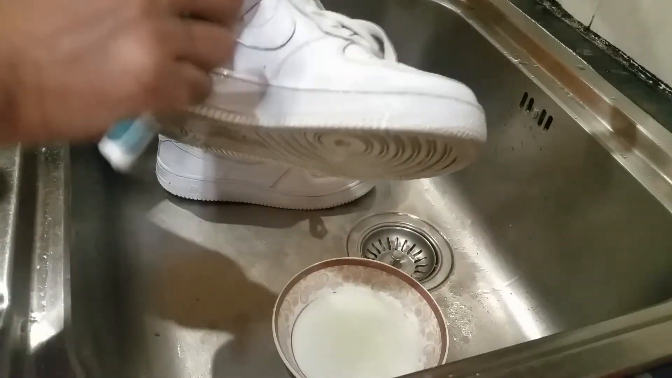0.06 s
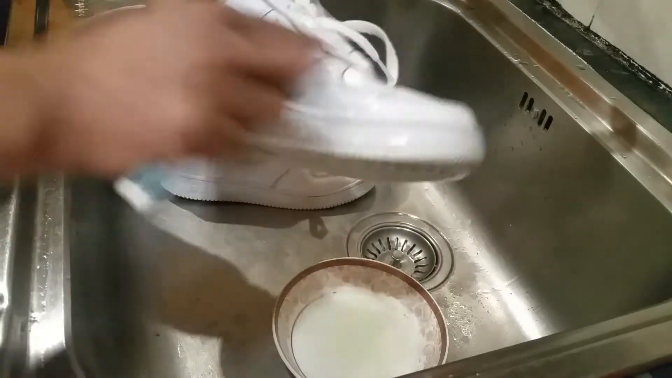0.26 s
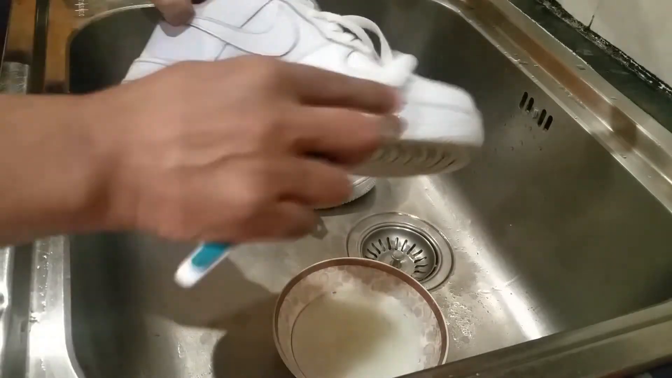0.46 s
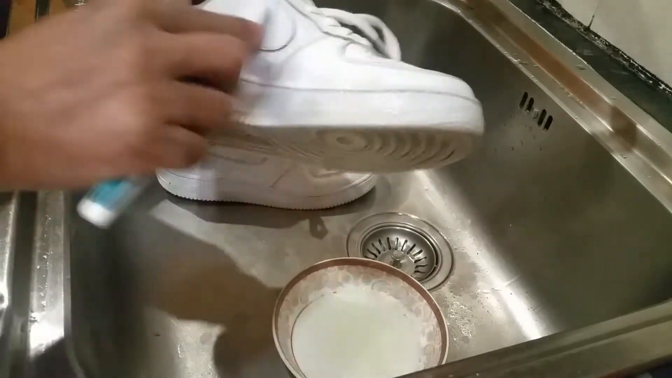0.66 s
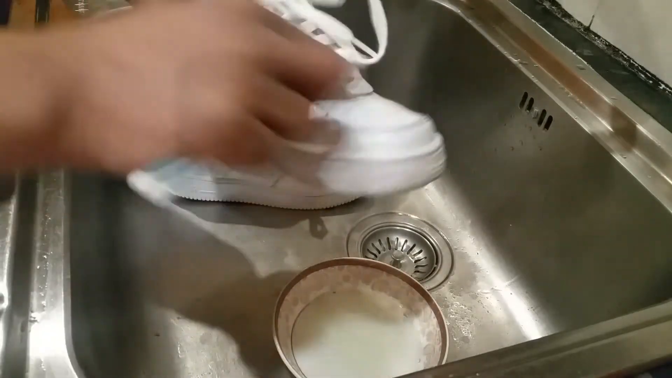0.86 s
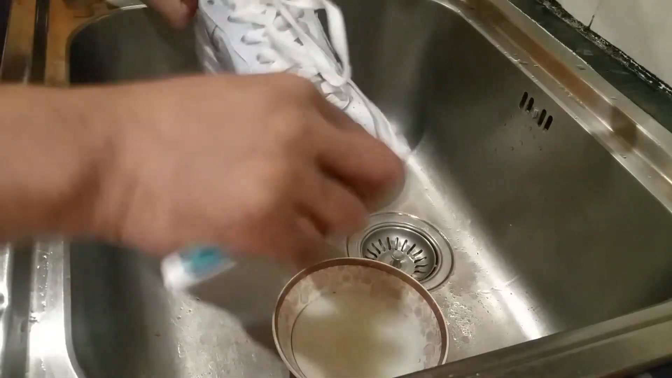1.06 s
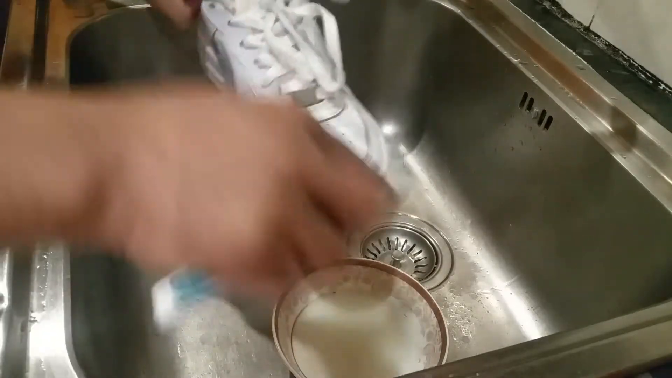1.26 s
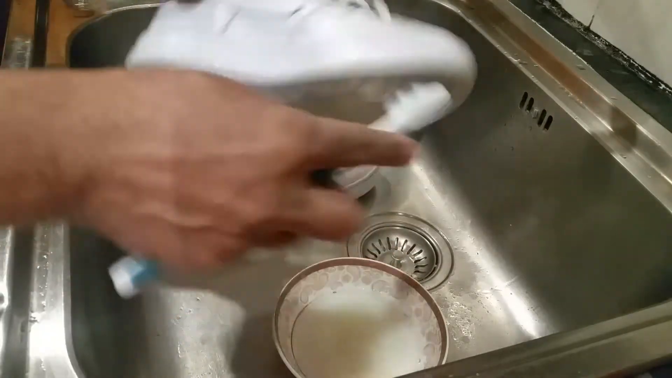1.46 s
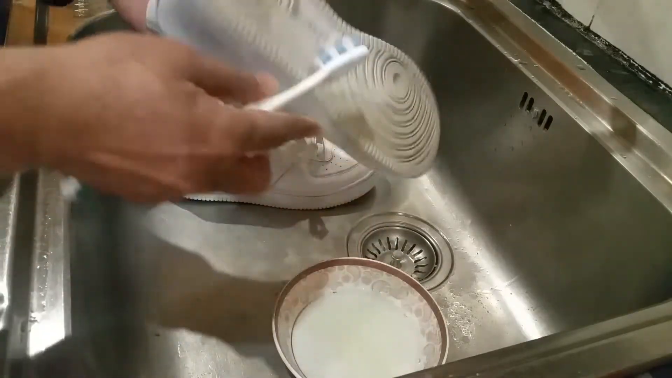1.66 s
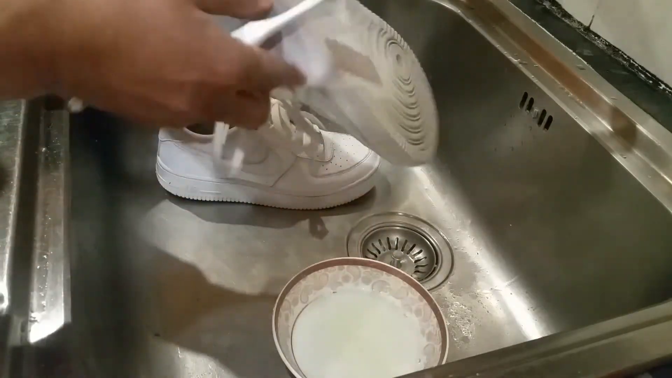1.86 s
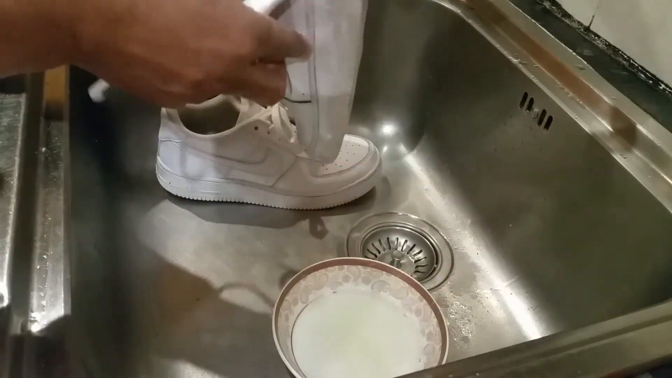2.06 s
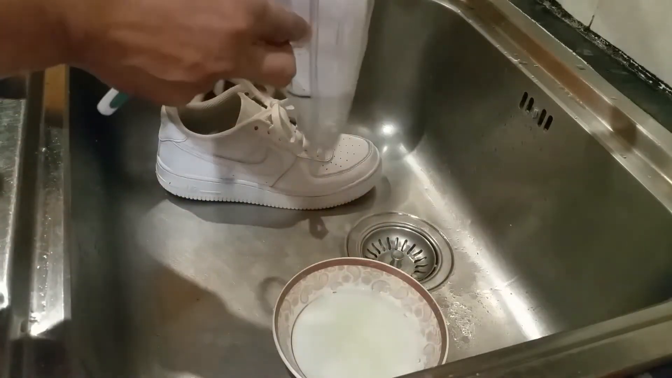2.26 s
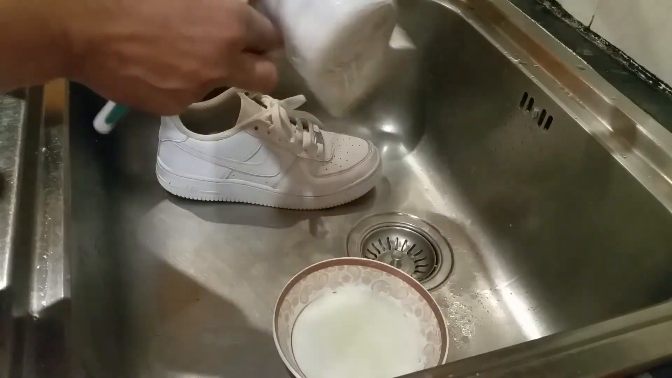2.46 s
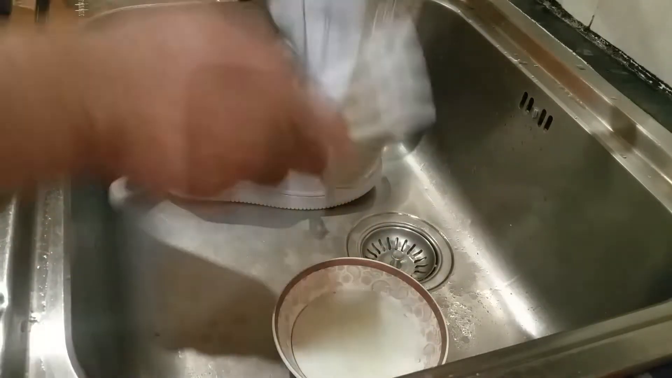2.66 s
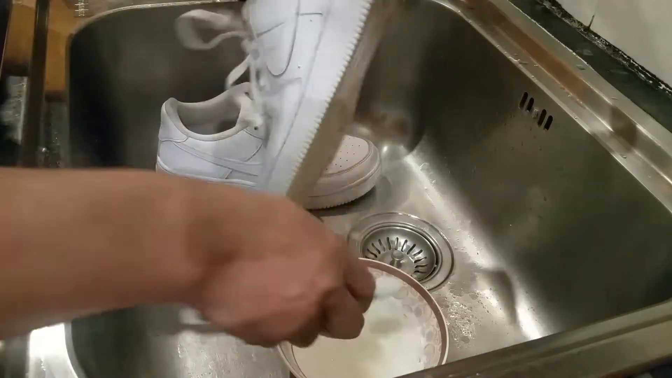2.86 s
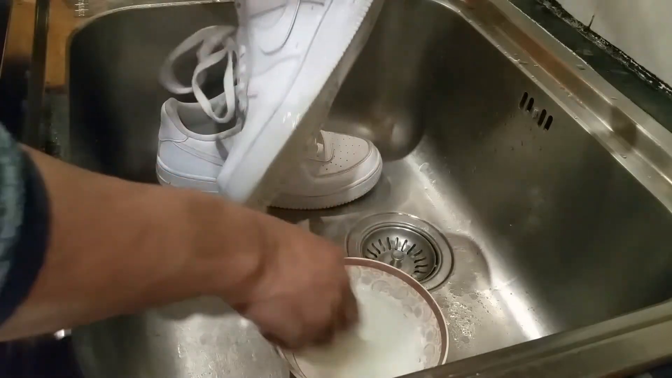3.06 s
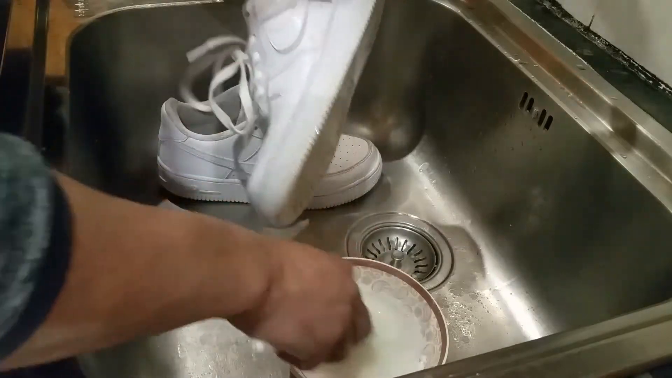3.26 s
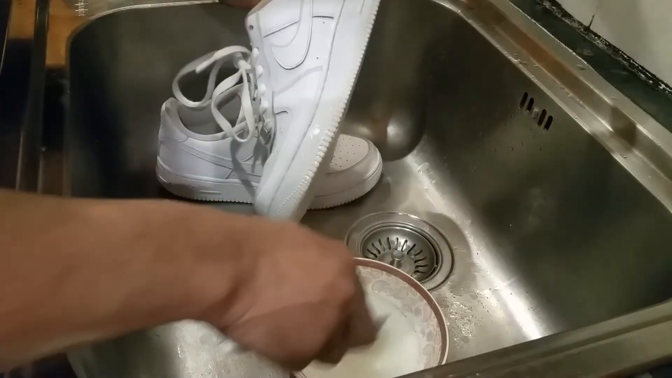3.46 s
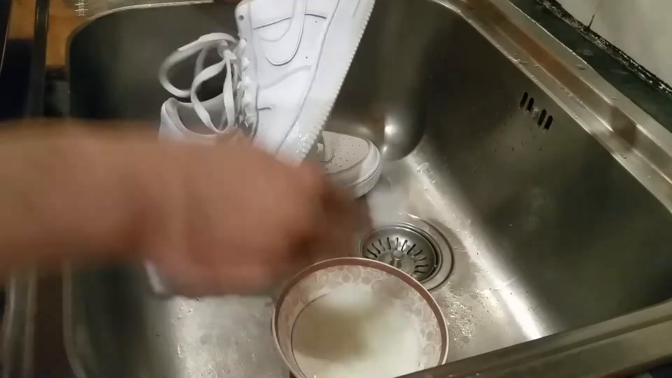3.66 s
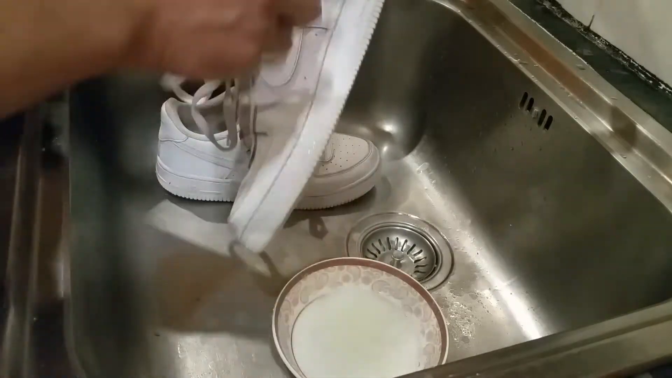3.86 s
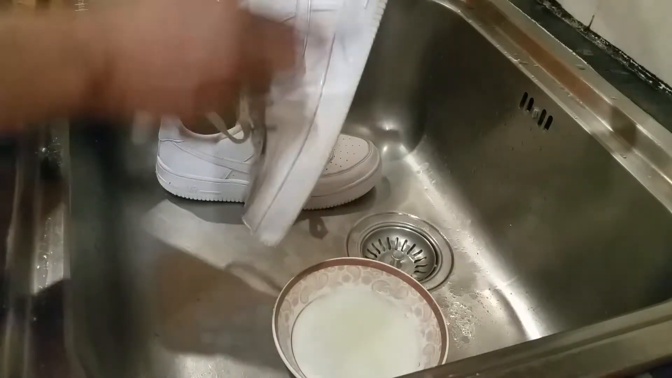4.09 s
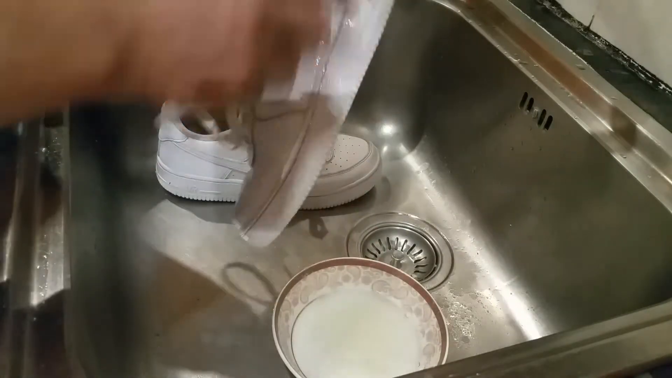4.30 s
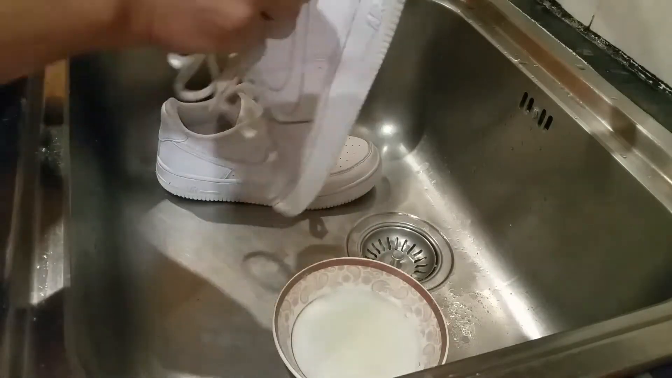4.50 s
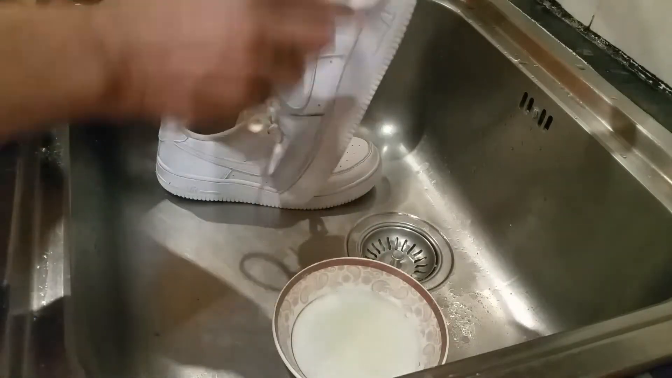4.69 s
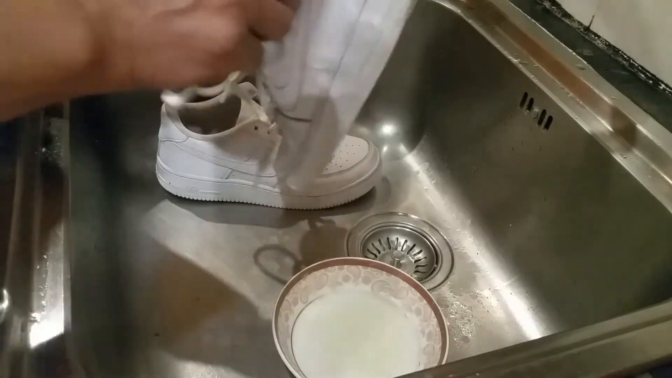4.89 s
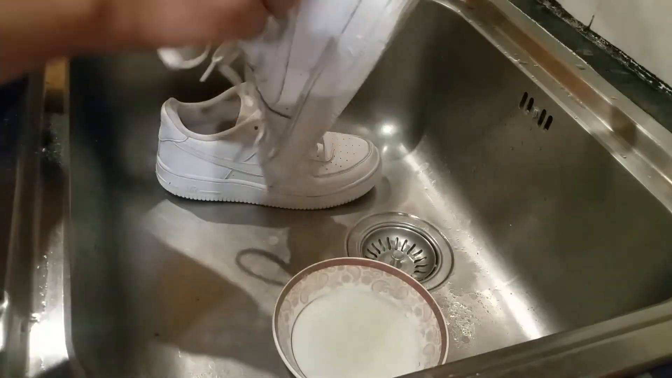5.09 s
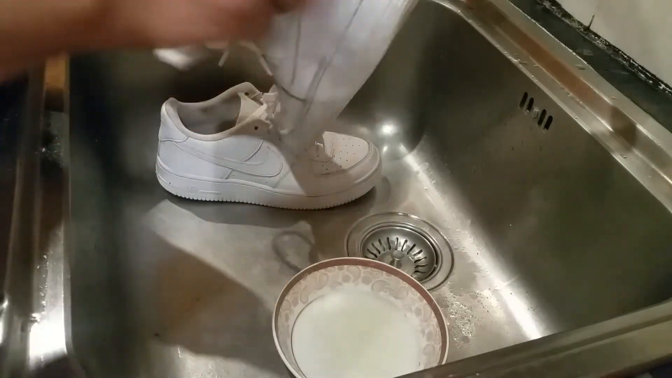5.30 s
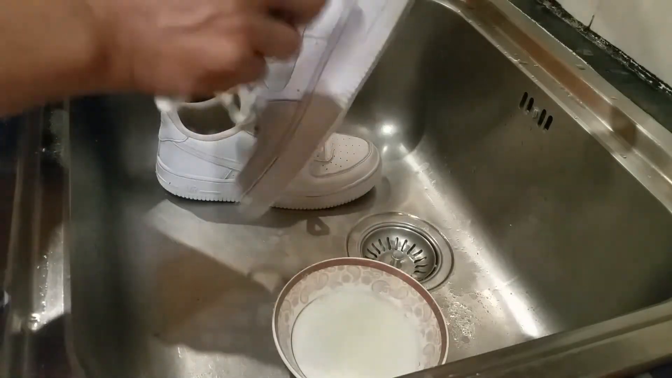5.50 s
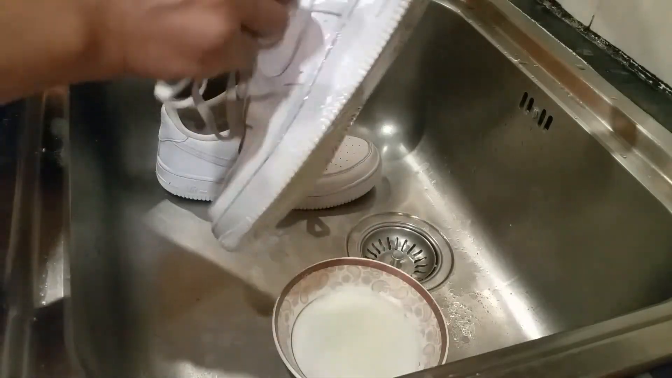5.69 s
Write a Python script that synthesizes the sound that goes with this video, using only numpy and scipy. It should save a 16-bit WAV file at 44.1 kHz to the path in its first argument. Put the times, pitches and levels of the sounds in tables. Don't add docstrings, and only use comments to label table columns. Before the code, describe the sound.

From the start, a toothbrush scrubs a leather trainer close to the microphone: quick, dry, bright rasps with a papery drag and a hollow body beneath. Dull knocks punctuate the strokes, strongest around 1.06 s, with sharp clicks near 0.23, 0.76 and 1.24 s. Scrubbing stops at about 1.4 s. In the lull, hands turn the shoe with soft creaks and rustles, small knocks from 1.75 to 2.4 s and a firmer thud at 2.67 s. At 3.2 s the brush taps a china bowl, faint wet swishes follow, and around 3.4 to 3.5 s the bowl gives a low judder on the steel basin. A light knock comes at 3.64 s, another at 3.97 s. From about 4.0 s brisk scrubbing resumes on the heel, continuing to the end with crisp ticks near 4.63, 5.0 and 5.49 s and low basin bumps around 5.1 s. Faint kitchen hum, short hard reflections, brushing toward the right.

```python
import sys
import numpy as np
from scipy import signal
from scipy.fft import rfft, irfft, next_fast_len
from scipy.io import wavfile
from scipy.ndimage import uniform_filter1d, minimum_filter1d, map_coordinates

SR = 44100
rng = np.random.default_rng(int(sys.argv[2]) if len(sys.argv) > 2 else 0)


def store_pcm(level_fs):
    pcm = np.round(np.clip(level_fs, -1, 1) * 32767).astype(np.int16)
    wavfile.write(sys.argv[1], SR, np.atleast_2d(pcm).T)


def makeup_ratio(level_db):
    decades = np.asarray(level_db, float) / 20
    return 10 ** decades


N = 253134

# pitch_hz, density_db (per Hz)
HUM_SPECTRUM = [(12, -21), (20, 3), (22, -14), (55, -3), (83, -10.5), (158, -5.5), (214, -15), (455, -17),
                (1640, -28), (1830, -23.5), (1990, -25), (3890, -30), (5000, -26), (8740, -35.5),
                (15900, -34.5)]
HUM_DB = -63
# pitch_hz, width_hz, level_db
WHINE = [(5460, 170, 5)]
# pitch_hz, likeness (0 to 1)
ALIKE = [(60, 0.61), (170, 0.71), (500, 0.66), (1000, 0.34), (2500, 0.3), (7000, 0.1)]
# pitch_hz, t60_s
ROOM_DECAY = [(200, 0.14), (2000, 0.11), (12000, 0.032)]

# pitch_hz, width_hz, level_db
BASIN_MODES = [(173, 9.2, 8), (220, 73, -13), (290, 34, -5), (436, 31, -22), (536, 24, -16), (770, 62, -23),
               (990, 56, -26)]
# time_s, level_db
JUDDER = [
    (3.385, -41),
    (3.4, -43),
    (3.42, -37),
    (3.44, -40),
    (3.455, -46),
    (3.475, -41),
    (3.5, -64),
    (3.52, -76),
]
CYCLES_PER_SLIP = 3
# start_s, peak_db, pitch_hz, t60_s
BUMPS = [(3.118, -48, 153, 0.13), (3.147, -51.5, 203, 0.095), (3.323, -45, 157, 0.091),
         (3.388, -34, 159.5, 0.12), (4.441, -47, 149, 0.19), (4.895, -41, 90.5, 0.082),
         (5.109, -35, 143, 0.12), (5.142, -39.5, 150, 0.11), (0.96, -41, 113, 0.11),
         (3.972, -45, 290, 0.11), (2.77, -51, 201, 0.12), (5.201, -45, 138.5, 0.42)]
# start_s, peak_db, t60_s, crack_db
TAPS = [
    (3.2053, -34, 0.017, -4),
    (3.212, -47, 0.016, -4),
    (3.241, -52, 0.02, -24),
    (3.2668, -42.5, 0.016, -14),
    (3.2812, -50, 0.018, -24),
]
# pitch_hz, level_db
CHINA = [(1150, -21), (1300, 8.5), (1460, -2), (2250, 3), (3200, -8)]
# fastest_s, speeding_up_s, slowing_s, level_db, spare_db
SWISH = [
    (3.33, 0.024, 0.02, -66, 0),
    (3.37, 0.034, 0.028, -63, 0),
    (3.66, 0.015, 0.02, -66, 0),
]
# pitch_hz, width_hz, level_db
FOAM = [(4250, 700, 0)]

# fastest_s, speeding_up_s, slowing_s, creak_db, rustle_over_creak_db
TURNS = [(1.42, 0.033, 0.025, -56, -7), (1.765, 0.018, 0.053, -57, -13), (1.82, 0.027, 0.056, -62, -6),
         (1.96, 0.087, 0.04, -59.5, -7.5), (2.03, 0.054, 0.099, -51.5, -6),
         (2.143, 0.011, 0.034, -57.5, -3.5), (2.19, 0.029, 0.057, -57, -2.5), (2.27, 0.04, 0.05, -65, 0.5),
         (2.36, 0.06, 0.057, -58, -5.5), (2.43, 0.044, 0.098, -52, -8), (2.6, 0.1, 0.14, -60.5, -9),
         (2.74, 0.049, 0.06, -52.5, -11), (2.92, 0.11, 0.034, -59, -14), (3.1, 0.33, 0.082, -62.5, -5),
         (3.36, 0.17, 0.087, -67, 5), (3.6, 0.44, 0.12, -65, -0.5), (3.818, 0.012, 0.012, -63, -13),
         (3.92, 0.065, 0.3, -75.5, 10)]
# pitch_hz, width_hz, level_db
GRIP = [(280, 200, -1), (461, 65, 4.5), (615, 51, 0), (884, 130, -2), (1350, 740, -10.5)]
# pitch_hz, density_db (per Hz)
SKIN = [(880, -5.5), (1500, -4.5), (1900, -6.5), (2430, -4), (6360, -14.5), (10100, -13), (15700, -17.5)]

# start_s, peak_db, main_ring_hz, t60_s,
# crack_db
KNOCKS = [(0.033, -53, 375, 0.16, -17), (0.098, -39, 404, 0.048, -20), (0.222, -44.5, 416, 0.069, -20),
          (0.349, -37, 670, 0.029, -16), (0.505, -39, 430, 0.056, -20), (0.679, -43, 288, 0.062, -34),
          (0.758, -39, 280, 0.055, -20), (0.594, -39, 826, 0.053, -16), (0.636, -28.5, 311, 0.044, 1.5),
          (0.933, -29.5, 274, 0.022, -28), (0.938, -28.5, 670, 0.027, -19), (0.968, -34.5, 326, 0.017, 4),
          (1.031, -31, 272, 0.019, -14), (1.058, -20, 334, 0.017, -36), (1.0598, -28.5, 766, 0.031, -21),
          (1.084, -30, 727, 0.023, -36), (1.235, -43.5, 400, 0.097, -15), (1.236, -42, 233, 0.031, -18),
          (1.245, -39.5, 628, 0.062, -20), (1.294, -37, 815, 0.041, -15), (1.304, -41, 435, 0.046, -15),
          (1.754, -34.5, 275, 0.03, -2), (1.894, -34.5, 242, 0.024, -11), (2.037, -33, 280, 0.024, -3.5),
          (2.136, -48, 424, 0.02, 2.5), (2.176, -43.5, 415, 0.033, 4), (2.195, -43, 448, 0.026, -3),
          (1.816, -48.5, 460, 0.034, -12), (1.7535, -38, 690, 0.03, -17), (2.422, -43, 400, 0.023, -15),
          (2.436, -41, 397, 0.024, -17), (2.668, -37, 742, 0.034, -4), (2.6684, -26.5, 416, 0.043, -13),
          (3.308, -48, 560, 0.016, -8), (3.6411, -40, 520, 0.024, -10), (3.651, -45, 456, 0.023, -22),
          (3.975, -34, 430, 0.022, -3),
          (4.24, -54, 418, 0.051, -20), (4.628, -50, 395, 0.052, -20), (4.849, -59, 410, 0.027, -20),
               (4.894, -28.5, 440, 0.012, -19), (4.45, -53, 407, 0.049, -15), (4.642, -47, 304, 0.087, -20),
               (4.451, -49, 398, 0.039, -15), (4.64, -62, 294, 0.065, -20), (5.429, -52, 425, 0.083, -20),
               (5.455, -53, 426, 0.07, -20), (5.456, -55, 446, 0.13, -20), (5.49, -49, 435, 0.074, -20)]
KNOCK_CLICK_DB = -37
# start_s, peak_db, ring_hz, t60_s, scrape_after_snap_db
TICKS = [(0.757, -22, 10700, 0.017, -14), (1.2376, -30.5, 8100, 0.027, 8), (1.2382, -12, 14000, 0.016, -17),
         (1.239, -28, 13800, 0.15, -11), (1.754, -45, 2400, 0.033, -24), (1.8126, -52, 1960, 0.03, -10),
         (1.826, -47, 3240, 0.021, -5), (1.8265, -56, 12000, 0.02, 0), (2.195, -55, 10000, 0.023, -6),
         (2.022, -42, 4170, 0.008, -10), (2.054, -46, 2460, 0.03, -8), (2.137, -46, 2470, 0.043, -24),
         (2.274, -44.5, 2900, 0.0093, -10), (2.3343, -44, 2400, 0.012, -10), (2.666, -52, 1980, 0.022, -10),
         (2.678, -47.5, 10000, 0.072, -3), (2.43, -48, 2500, 0.026, -4), (3.0857, -52, 1270, 0.033, -14),
         (3.7186, -51, 5200, 0.03, -16), (3.8873, -50.5, 1834, 0.034, -10),
         (5.486, -17.5, 6850, 0.017, -23), (0.2265, -18.5, 4800, 0.016, -14),
         (0.7807, -17.5, 11100, 0.021, -13), (3.641, -43.5, 2260, 0.03, -13), (3.9735, -45, 1960, 0.01, -3),
         (4.188, -41, 9150, 0.016, 3), (4.6306, -23, 9100, 0.012, -9), (4.647, -37, 10100, 0.03, -15),
         (4.8416, -36, 7960, 0.034, -3)]
# start_s, peak_db, pitch_hz, t60_s
SNAPS = [(1.0325, -27, 616, 0.0094), (1.037, -33, 700, 0.007), (1.0682, -35, 600, 0.0054),
         (1.2376, -18, 6100, 0.0023), (1.2375, -21.5, 3000, 0.0016), (1.2373, -20, 10500, 0.0017),
         (1.749, -38, 1500, 0.0017), (1.7492, -61, 7000, 0.004), (1.7558, -32, 850, 0.0088),
         (1.7638, -37, 895, 0.0056), (1.814, -47, 600, 0.008), (1.8258, -52, 11500, 0.004),
         (1.828, -44, 3620, 0.003), (1.8282, -52, 12800, 0.005), (1.8315, -60, 14500, 0.002),
         (1.8935, -42, 700, 0.014), (2.0367, -38, 950, 0.009), (3.973, -43, 4000, 0.002),
         (2.6664, -49, 3500, 0.003), (2.6672, -31, 960, 0.0083), (2.6692, -27, 530, 0.014),
         (2.675, -43, 1250, 0.0063), (2.686, -42, 800, 0.0092), (2.669, -47, 1690, 0.005),
         (2.138, -46, 900, 0.0068), (2.177, -43, 1040, 0.006), (2.198, -46, 800, 0.008),
         (2.4285, -43, 600, 0.01), (2.001, -41, 900, 0.006), (2.0425, -42, 805, 0.008),
         (1.7654, -42, 1600, 0.004), (1.774, -46, 800, 0.006), (3.2053, -45, 5000, 0.0022),
         (3.223, -56, 1300, 0.012), (3.2746, -56, 1240, 0.013), (3.309, -41.5, 524, 0.021),
         (4.1805, -42, 6000, 0.004), (4.6465, -22, 8400, 0.003), (5.004, -24, 7500, 0.003)]

# fastest_s, speeding_up_s, slowing_s, bristle_db, drag_over_bristle_db
SIDE_STROKES = [(0.074, 0.11, 0.049, -35.5, -12), (0.182, 0.014, 0.023, -38.5, -13),
                (0.239, 0.055, 0.023, -31.5, -17), (0.375, 0.074, 0.038, -37, -11),
                (0.451, 0.03, 0.033, -40, -12), (0.49, 0.033, 0.033, -36.5, -10),
                (0.52, 0.041, 0.049, -37, -18), (0.635, 0.041, 0.026, -39, -10.5),
                (0.701, 0.12, 0.021, -36.5, -11), (0.758, 0.011, 0.049, -41, -11.5),
                (0.848, 0.071, 0.032, -32.5, -14), (0.941, 0.084, 0.049, -42.5, -8),
                (1.046, 0.013, 0.0029, -40.5, -7.5), (1.093, 0.034, 0.032, -36, -6.5),
                (1.336, 0.042, 0.015, -35.5, -9)]
# fastest_s, speeding_up_s, slowing_s, bristle_db, drag_over_bristle_db
HEEL_STROKES = [(4.068, 0.036, 0.012, -34.5, -20), (4.096, 0.027, 0.034, -40, -16.5),
                (4.017, 0.016, 0.022, -48, -11), (4.187, 0.004, 0.0057, -45.5, -10),
                (4.204, 0.008, 0.018, -40.5, -18), (4.232, 0.027, 0.027, -36, -16.5),
                (4.378, 0.056, 0.035, -38.5, -12.5), (4.417, 0.15, 0.013, -38.5, -32),
                (4.499, 0.033, 0.016, -44, -18), (4.47, 0.013, 0.02, -47.5, -6),
                (4.563, 0.0092, 0.021, -45.5, -15.5), (4.627, 0.015, 0.045, -34, -24),
                (4.676, 0.054, 0.037, -34.5, -19.5), (4.803, 0.053, 0.011, -43.5, -14.5),
                (4.861, 0.018, 0.023, -39, -10.5), (4.917, 0.023, 0.039, -43.5, -8.5),
                (5.003, 0.029, 0.048, -34, -19.5), (5.114, 0.043, 0.03, -41, -13),
                (5.161, 0.011, 0.021, -37.5, -13.5), (5.255, 0.01, 0.032, -48, -5.5),
                (5.193, 0.011, 0.019, -45, -6), (5.296, 0.055, 0.021, -40, -26),
                (5.397, 0.052, 0.013, -36.5, -11.5), (5.414, 0.0062, 0.037, -36, -9.5),
                (5.491, 0.026, 0.019, -35, -13), (5.517, 0.024, 0.034, -34.5, -18.5),
                (5.643, 0.05, 0.0076, -38, -10), (5.734, 0.037, 0.007, -46, -12)]
# pitch_hz, density_db (per Hz)
BRISTLE = [(1180, -22), (2000, -19), (2380, -5.5), (3000, -8), (3470, -2.5), (5070, -0.5), (5530, 2),
           (6130, -1), (10100, 2.5), (13800, 0.5), (15700, -2.5)]
# time_s,
# low_flick_db
PRESS = [(0, 3.5), (.08, -1), (.18, -3.5), (.24, 3), (.36, 2.5), (.45, -3.5), (.62, 1), (.7, 0.5),
         (.77, -4), (.83, 0), (.87, -2), (1.08, -3), (1.32, -0.5),
         (4.03, -8), (4.09, -2), (4.2, 3), (4.3, 4), (4.38, 0), (4.57, 1), (4.64, 5), (4.69, -3),
              (4.86, 5.5), (5.001, 0.5), (5.16, 6), (5.27, -5), (5.42, 1), (5.52, -13), (5.64, -4.5)]
# pitch_hz, width_hz, level_db
LEATHER = [(976, 160, -7), (1346, 510, -2), (1567, 516, 0.5), (2190, 1080, -4.5), (3150, 1430, -7)]
# pitch_hz, width_hz, level_db
COUNTER = [(960, 240, -1), (1170, 330, 1.5), (1630, 370, 1), (2180, 410, 1), (3400, 990, -2)]
# pitch_hz, width_hz, level_db
SHOE = [(272, 175, 2), (446, 64, 6), (622, 128, 5), (890, 140, 1.5), (923, 9, -10)]
# pitch_hz, width_hz, level_db
HEEL = [(134, 74, -7.5), (293.3, 17, -2), (425, 56, -2.5), (690, 410, -11), (905, 71, -3.5)]
# time_s, over_drag_db
COUPLING = [(0, 0), (.2, -5), (.35, -1), (.5, -6.5), (.72, 1.5), (.86, -13), (.93, -5.5), (.99, 2.5),
            (1.02, -7), (1.045, 0), (1.1, -4), (1.38, -6), (4, -7.5), (4.2, -6.5), (4.4, -8.5), (4.5, -1.5),
            (4.7, -13.5), (4.83, -6), (4.9, -6), (5.05, -3), (5.15, -4), (5.3, 1), (5.42, -13), (5.55, -12),
            (5.7, -3)]
PORT_DB = [-5.5, -5]
TAIL_DB, TAIL_T60_S, TAIL_RISE_S = -5.5, 0.13, 0.048
DRAG_LINGERS, HOLLOW_LINGERS = 1.175, 1.68
BENT_BELOW_HZ = 3800
FACE_HZ, FACE_WIDTH_HZ, FACE_DB = 8600, 2400, [0.4, 0.5]

# start_s, end_s, low_hz, high_hz
LONG_DROPOUTS = [
    (4.22, 4.41, 500, 620),
    (4.61, 4.71, 480, 620),
    (5.49, 5.54, 215, 300),
    (4.28, 4.32, 1080, 1200),
]
DROPOUT_DB, DROPOUT_RARE, BUSY_DB = -30, 2.72, -52
CEILING, TOP_HZ = .29, 15920


def unit(x):
    return x / np.sqrt(np.mean(x ** 2) + 1e-20)


def along(points, hz):
    f, v = np.transpose(points)
    return np.interp(np.log(hz + 1), np.log(f + 1), v)


def curves(rows):
    s, *cols = np.transpose(rows)
    return [np.interp(np.arange(N) / SR, s, c) for c in cols]


def during(rows):
    s0, s1 = rows[0][0], rows[-1][0]
    return np.interp(np.arange(N) / SR, [s0 - .015, s0, s1, s1 + .015], [0, 1, 1, 0])


def wobble(rate):
    knots = rng.standard_normal(int(N * rate / SR) + 4)
    return map_coordinates(knots, [np.arange(N) * rate / SR])


def filtered(x, response):
    m = next_fast_len(N + SR // 2)
    return irfft(rfft(x, m) * response(np.fft.rfftfreq(m, 1 / SR)), m)[..., :N]


def modes(table):
    def response(f):
        total = 0
        for k, (centre, width, db) in enumerate(table):
            damping = 1j * f * width
            total = total + (-1) ** k * makeup_ratio(db) * damping / (centre * centre - f * f + damping)
        return total
    return response


def ports(pair):
    def mix(hz):
        turn = np.arccos(np.clip(along(ALIKE, hz), -1, 1)) / 2
        return np.array([np.cos(turn), np.sin(turn)])
    mid, side = filtered(pair, mix)
    return np.array([mid + side, mid - side])


def sides(pan_db):
    return makeup_ratio(np.outer([.5, -.5], pan_db))


def random_field(shape, bands, frames):
    field = uniform_filter1d(rng.standard_normal(shape), size=bands, axis=0)
    return unit(uniform_filter1d(field, size=frames, axis=1))


def patchy(x, depth_db):
    z = signal.stft(x, nperseg=512)[2]
    field = random_field(z.shape[1:], 2, 10)
    return signal.istft(z * makeup_ratio(depth_db * (field - 0.18 * field ** 2)), nperseg=512)[1][:, :N]


def flicks(spread_db, clump_db, clump_rate, patch_db):
    uneven_db = spread_db * np.minimum(rng.exponential(size=(2, N)), 5)
    size_db = uneven_db + clump_db * wobble(clump_rate)
    return ports(patchy(rng.standard_normal((2, N)) * makeup_ratio(size_db), patch_db))


def motion(rows, second=False, lingers=1, tail_db=-60):
    s, rise, fall, db, over_db = np.array(rows).T[:, :, None]
    u = np.arange(0, N, 32) / SR - s
    after = np.maximum(u, 0)
    span = lingers * np.maximum(np.where(u < 0, rise, fall), 1e-3)
    bell = np.exp(-2 * (u / span) ** 2)
    spring = (1 - np.exp(-after / TAIL_RISE_S)) * makeup_ratio(2 * (tail_db - 60 * after / TAIL_T60_S / 2))
    power = (makeup_ratio(2 * (db + second * over_db)) * (bell + spring)).sum(0)
    return np.interp(np.arange(N), np.arange(0, N, 32), np.sqrt(power))


def ring(hz, t60, t, attack):
    return np.sin(2 * np.pi * hz * t) * makeup_ratio(-60 * t / t60) * (1 - np.exp(-t / attack))


def hiss(hz, pole, t):
    poles = [1, -2 * pole * np.cos(2 * np.pi * hz / SR), pole ** 2]
    return signal.lfilter([1, 0, -1], poles, rng.standard_normal((2, len(t))))


def add(track, s, sound):
    track[:, round(s * SR):][:, :sound.shape[-1]] += sound


def blank(seconds):
    return np.zeros((2, N + SR)), np.arange(int(seconds * SR)) / SR


def hum():
    air = ports(rng.standard_normal((2, N)) * makeup_ratio(0.75 * wobble(7.26)))

    def colour(hz):
        return makeup_ratio(along(HUM_SPECTRUM, hz)) * (1 + np.abs(modes(WHINE)(hz)) ** 2 / 4)
    return makeup_ratio(HUM_DB) * unit(filtered(air, colour))


def room(x):
    noise = ports(rng.standard_normal((2, N)))[:, :SR // 2]
    hz, t, z = signal.stft(noise, SR, nperseg=256)
    tail = signal.istft(z * makeup_ratio(-60 * t / along(ROOM_DECAY, hz)[:, None]), SR, nperseg=256)[1]
    delayed = np.pad(x, ((0, 0), (200, 0)))
    return signal.fftconvolve(delayed, tail / np.linalg.norm(tail[0]), axes=1)[:, :N]


def bowl():
    db, = curves(JUDDER)
    slip_count = np.floor(np.arange(N + 1) / SR * BASIN_MODES[0][0] / CYCLES_PER_SLIP)
    slips = np.diff(slip_count) * during(JUDDER)

    def plate(hz):
        return modes(BASIN_MODES)(hz) / (1 + 1j * hz / 1100) ** 2
    return makeup_ratio(49.0) * filtered(slips * makeup_ratio(db), plate) * sides(-2.1)


def basin_bumps():
    track, t = blank(0.25)
    for s, db, hz, t60 in BUMPS:
        low = 0.24 * ring(0.69 * hz, 0.26, t, 0.016)
        add(track, s, makeup_ratio(db - 1.5) * (ring(hz, t60, t, 0.0017) + low))
    return track[:, :N] * sides(-1.2)


def china_taps():
    track, t = blank(0.25)
    for s, db, t60, crack_db in TAPS:
        chime = 0
        for hz, level in CHINA:
            tilt_db = 0.66 * crack_db * np.log2(hz / 1300)
            chime = chime + makeup_ratio(level + tilt_db + rng.normal(0, 1.9)) * ring(hz, t60, t, 0.00039)
        crack = makeup_ratio(crack_db - 60 * t / 0.005) * hiss(2160, 0.91, t)
        add(track, s, makeup_ratio(db - 13.0) * (chime + crack))
    return track[:, :N] * sides(-1.2)


def splash():
    return motion(SWISH) * unit(filtered(flicks(3.0, 2.5, 120, 2.5), modes(FOAM)))


def hands():
    creak = unit(filtered(flicks(3.8, 3.2, 80, 2.7), modes(GRIP)))
    rustle = unit(filtered(flicks(3.0, 1.2, 130, 0.98), lambda hz: makeup_ratio(along(SKIN, hz))))
    creaking = motion(TURNS) * makeup_ratio(-1.5) * creak
    return creaking + motion(TURNS, True) * makeup_ratio(1.0) * sides(-1.1) * rustle


def knocks():
    track, t = blank(0.25)
    for s, db, hz, t60, crack_db in KNOCKS:
        ratios = np.array([1.3, 1.75, 2.1, 2.8, 3.9]) * makeup_ratio(rng.normal(0, 1.0, 5))
        thud = ring(hz, t60, t, 0.0045)
        for r in ratios:
            thud += makeup_ratio(-9.0) * ring(hz * r, 0.92 * t60 / r ** 1.6, t, 0.0031)
        thud *= makeup_ratio(-70 * (t / t60) ** 3)
        crack = makeup_ratio(crack_db - 25.0 - 60 * t / 0.038) * hiss(860, 0.96, t)
        crack = crack + makeup_ratio(KNOCK_CLICK_DB - 21.0 - 60 * t / .025) * hiss(7000, 0.26, t)
        add(track, s, makeup_ratio(db + 6.0) * (thud + crack * (1 - np.exp(-t / 0.0026))))
    return track[:, :N] * sides(-1.2)


def ticks():
    track, t = blank(0.25)
    for s, db, hz, t60, scrape_db in TICKS:
        decay = makeup_ratio(-7.0 - 60 * t / 0.0014) + makeup_ratio(scrape_db - 60 * t / t60)
        snap = decay * hiss(min(hz, 6500), 0.65 if hz > 6000 else 0.84, t)
        add(track, s, makeup_ratio(db - 7.5) * sides(-0.41) * (snap + ring(hz, 0.88 * t60, t, 0.000067)))
    return track[:, :N] * sides(-1.2)


def snaps():
    track, t = blank(0.05)
    for s, db, hz, t60 in SNAPS:
        add(track, s, makeup_ratio(db + 0.5) * sides(-1.3) * ring(hz, t60, t, 0.18 / hz))
    return track[:, :N]


def brush():
    tips = unit(filtered(flicks(1.9, 1.0, 260, 1.9), lambda hz: makeup_ratio(along(BRISTLE, hz))))
    press_db, = curves(PRESS)
    low_flicks = filtered(tips, lambda hz: 1 / (1 + (hz / BENT_BELOW_HZ) ** 4))
    tips = tips + (makeup_ratio(press_db) - 1) * low_flicks
    rub = flicks(2.7, 1.53, 90, 3.2)
    push = flicks(2.5, 3.2, 60, 2.2)
    coupling_db, = curves(COUPLING)
    out = np.zeros((2, N))
    holds = zip((SIDE_STROKES, HEEL_STROKES), (LEATHER, COUNTER), (SHOE, HEEL), PORT_DB, FACE_DB)
    for strokes, skin, cavity, pan_db, face_db in holds:
        def hollow_response(hz):
            response = modes(cavity)(hz)
            return response * np.abs(response) ** 0.26

        def face(hz):
            return makeup_ratio(face_db * np.exp(-((hz - FACE_HZ) / FACE_WIDTH_HZ) ** 2))
        drag = unit(filtered(rub, modes(skin)))
        hollow = unit(filtered(push, hollow_response))
        tip_gain = motion(strokes, tail_db=TAIL_DB) * makeup_ratio(2.5)
        drag_gain = motion(strokes, True, DRAG_LINGERS, TAIL_DB) * makeup_ratio(2.0)
        hollow_gain = motion(strokes, True, HOLLOW_LINGERS, TAIL_DB) * makeup_ratio(coupling_db + 1.5)
        out += tip_gain * sides(pan_db) * filtered(tips, face)
        out += drag_gain * sides(0.081 * pan_db) * drag
        out += hollow_gain * sides(0.46 * pan_db) * hollow
    return out


def scene():
    contacts = knocks() + china_taps() + ticks() + basin_bumps()
    near = brush() + hands() + contacts + splash() + snaps()
    return near + makeup_ratio(-7.5) * room(near) + bowl() + sides(-0.35) * hum()


def dropouts(x):
    z = signal.stft(x, nperseg=1024, noverlap=768)[2]
    field = random_field(z.shape[1:], 4, 14)
    field = -minimum_filter1d(minimum_filter1d(-field, size=11, axis=1), size=3, axis=0)
    for start, end, low_hz, high_hz in LONG_DROPOUTS:
        bands = slice(round(low_hz * 1024 / SR), round(high_hz * 1024 / SR) + 1)
        frames = slice(round(start * SR / 256), round(end * SR / 256))
        field[bands, frames] = 2 * DROPOUT_RARE
    field[:52] = np.where(field[:52] < 2 * DROPOUT_RARE, 0, field[:52])
    busy = minimum_filter1d((np.abs(z[:, 52:]) ** 2).sum((0, 1)), size=9) > makeup_ratio(2 * BUSY_DB)
    depth = np.clip(5 * (field - DROPOUT_RARE) + 1, 0, 1)
    return signal.istft(z * makeup_ratio(DROPOUT_DB * busy * depth), nperseg=1024, noverlap=768)[1][:, :N]


def band_limit(x):
    return signal.sosfilt(signal.butter(12, 16880, fs=SR, output="sos"), x)


def record(dry):
    rounded = dry / (1 + np.abs(dry / CEILING) ** 4) ** (1 / 4)
    mix = filtered(dropouts(rounded), lambda hz: hz < TOP_HZ)
    return band_limit(mix)


dry = scene()
out = record(dry)
store_pcm(out)
```